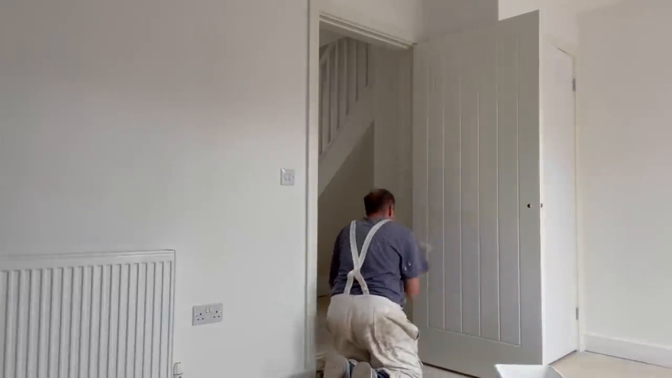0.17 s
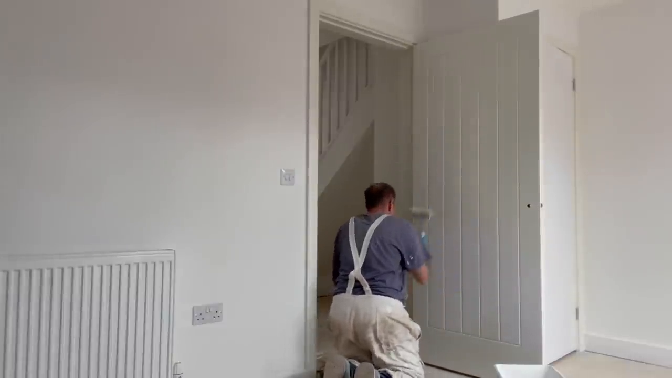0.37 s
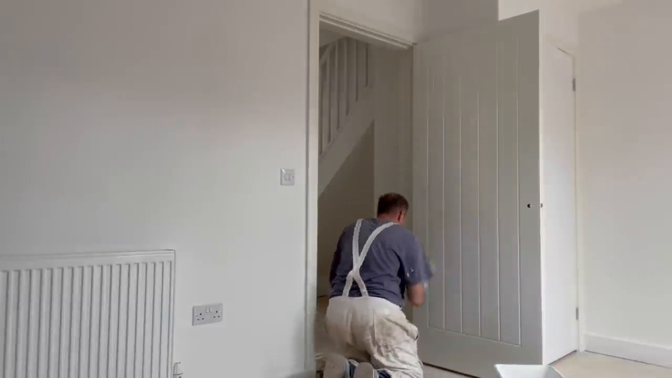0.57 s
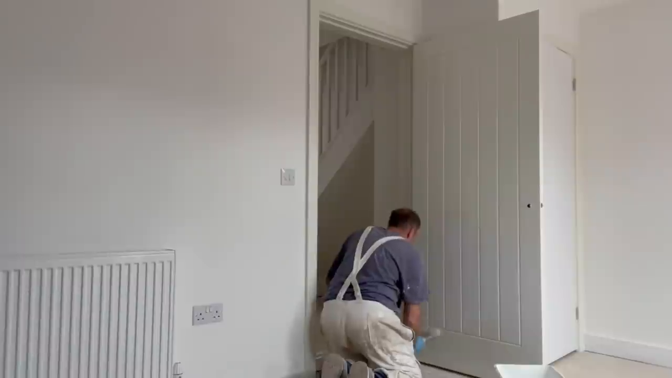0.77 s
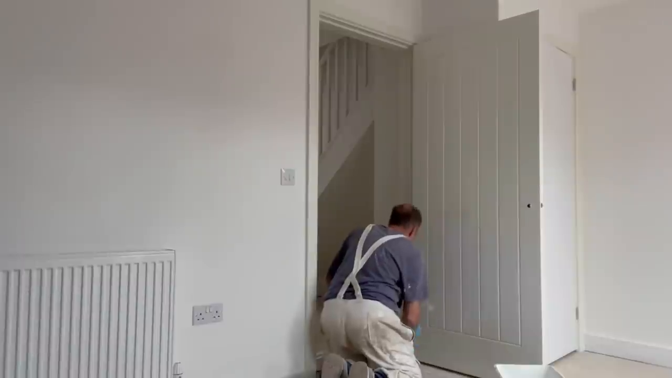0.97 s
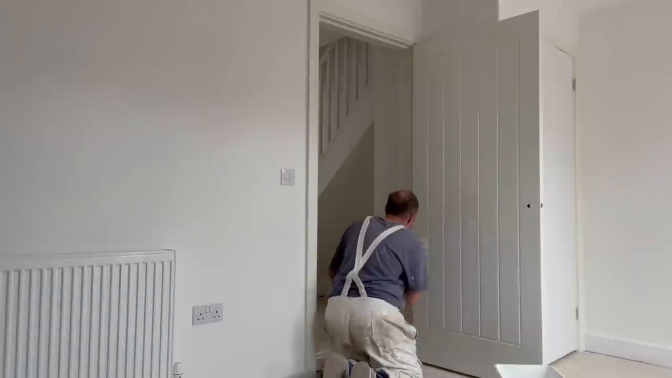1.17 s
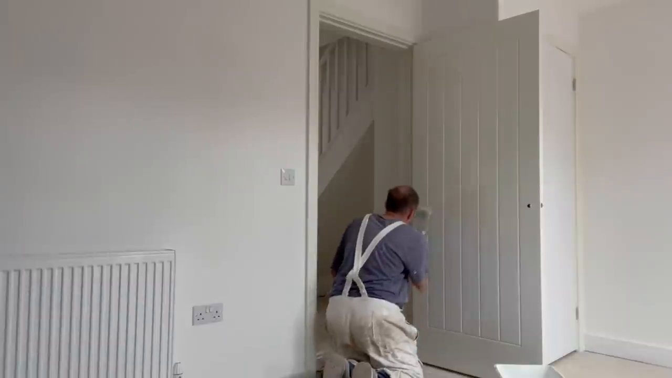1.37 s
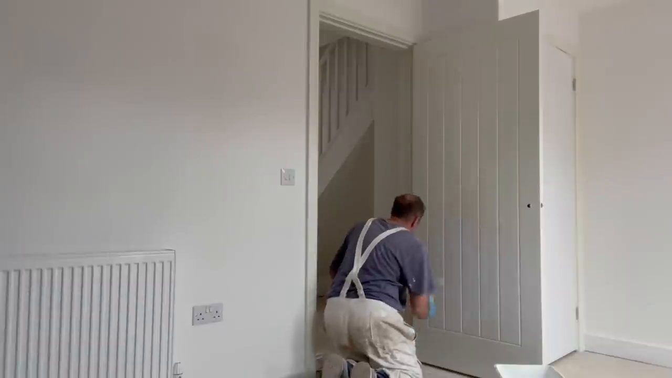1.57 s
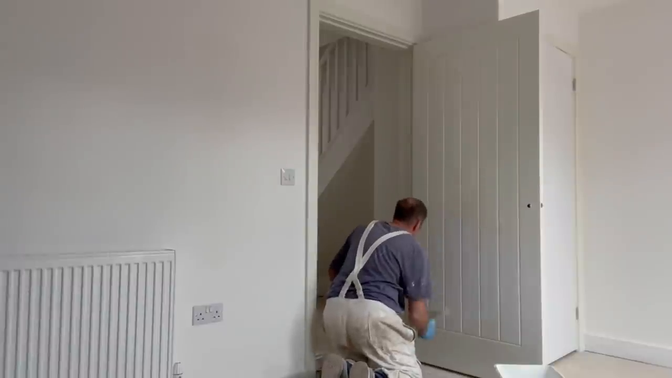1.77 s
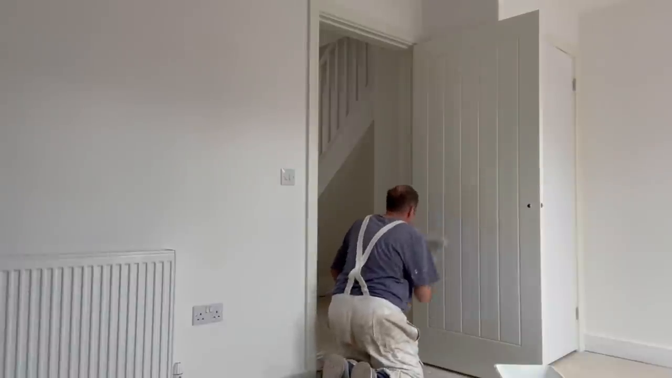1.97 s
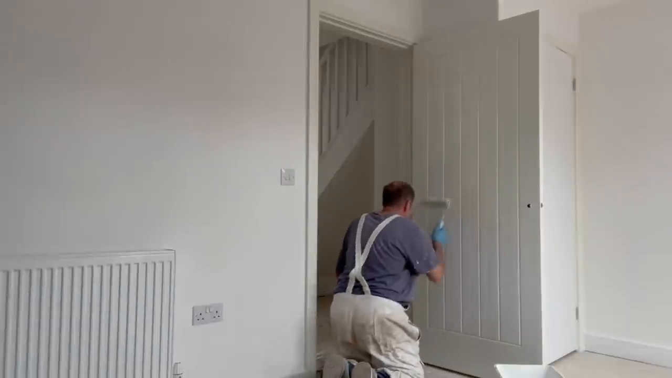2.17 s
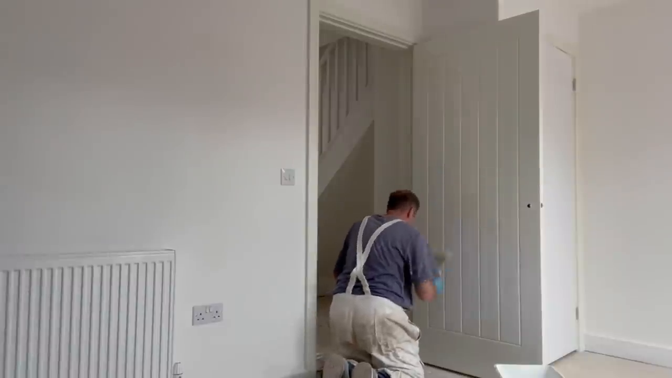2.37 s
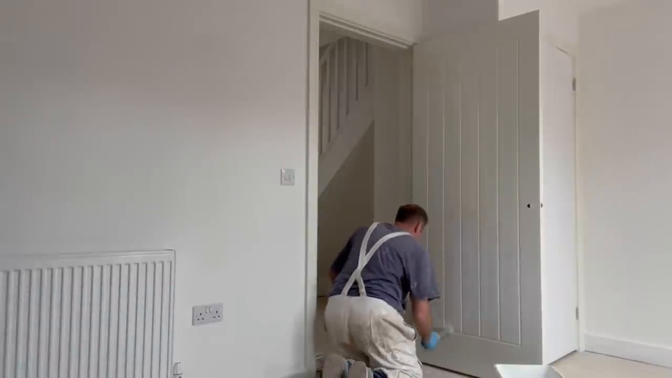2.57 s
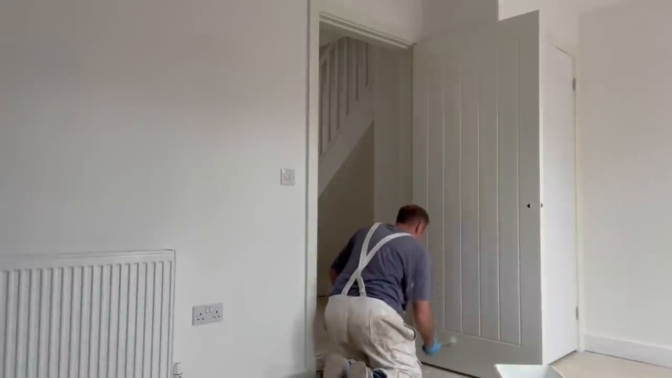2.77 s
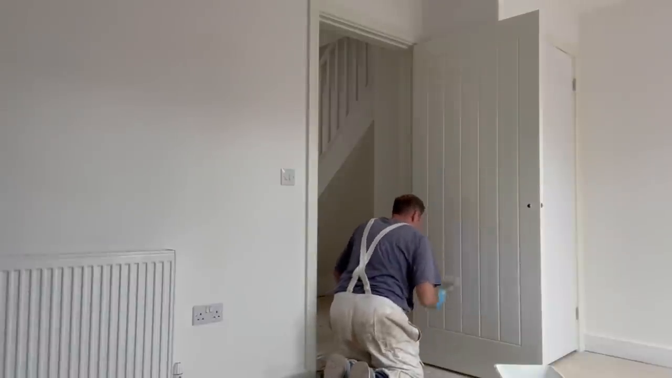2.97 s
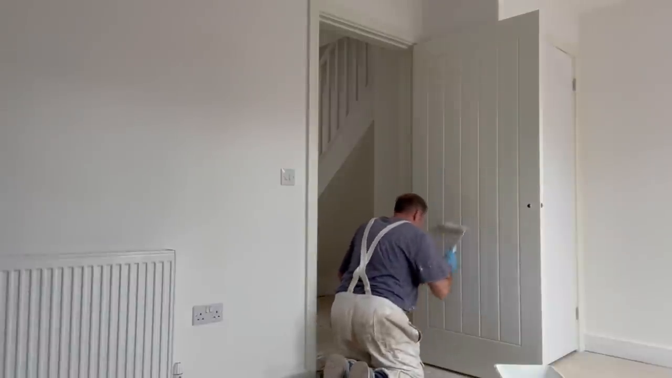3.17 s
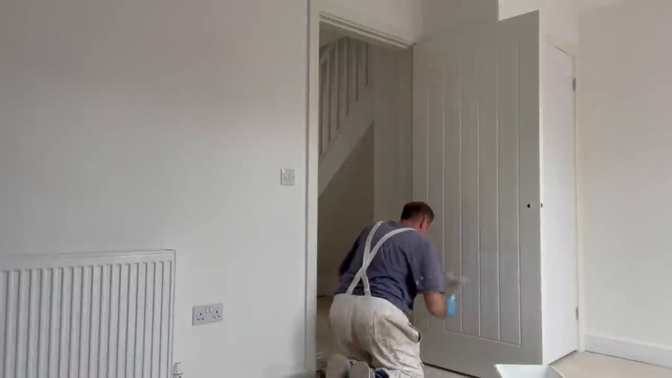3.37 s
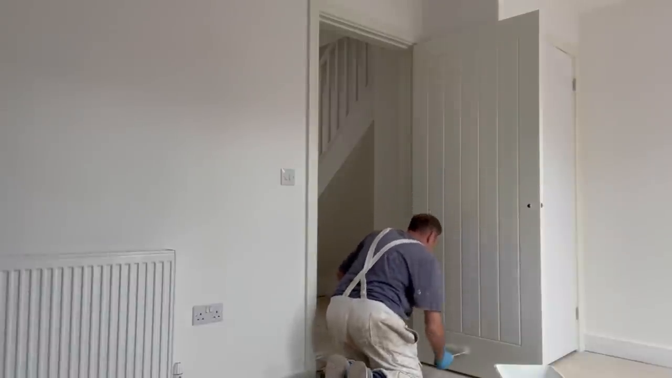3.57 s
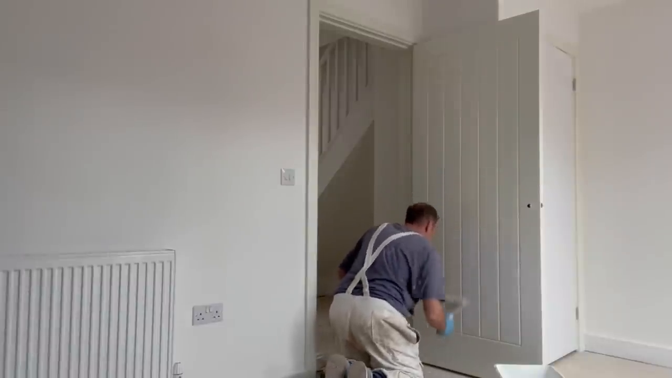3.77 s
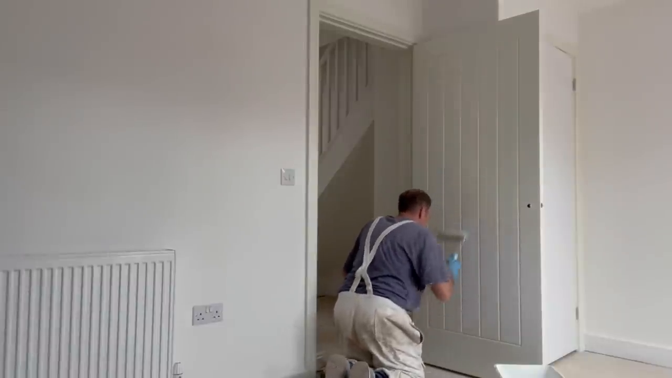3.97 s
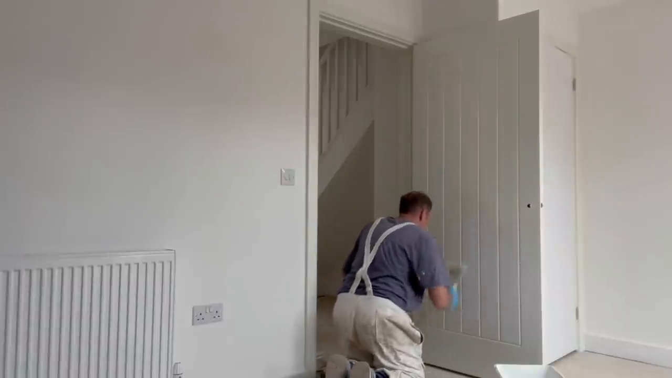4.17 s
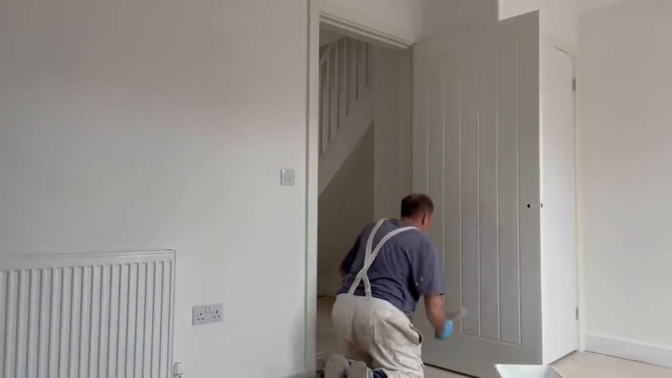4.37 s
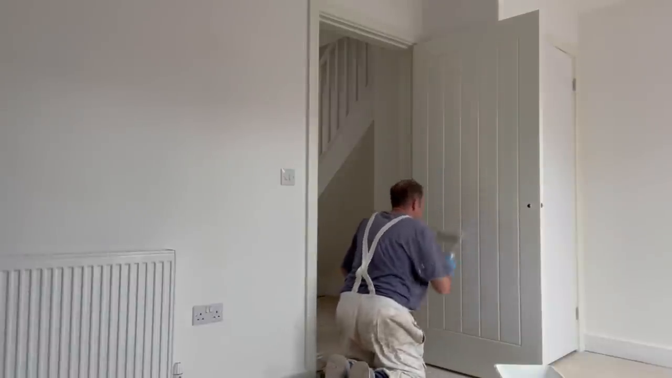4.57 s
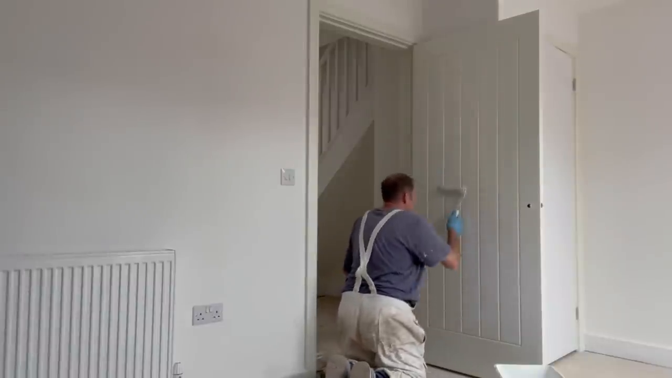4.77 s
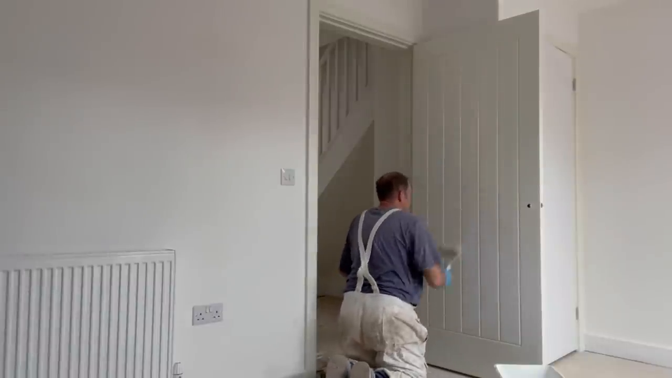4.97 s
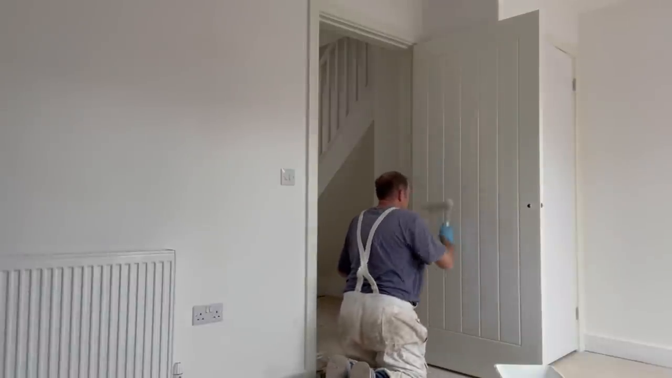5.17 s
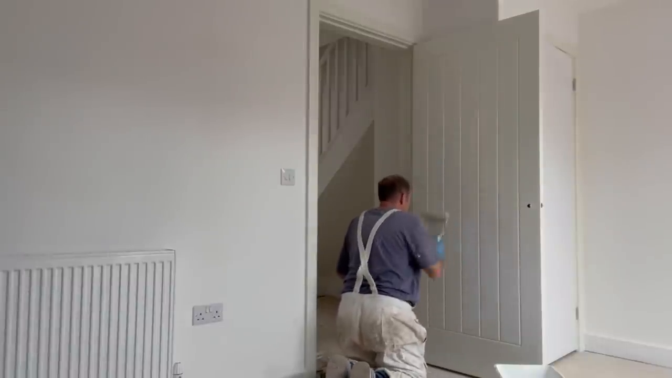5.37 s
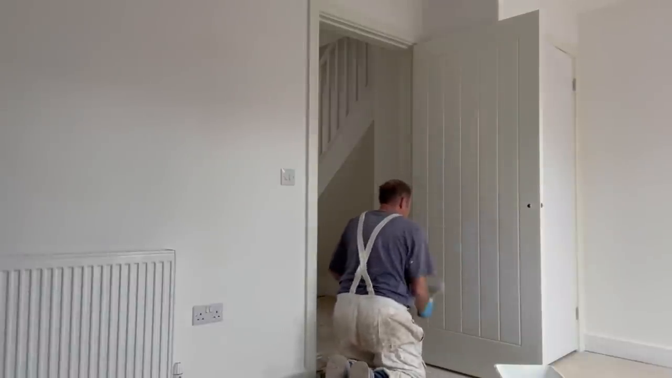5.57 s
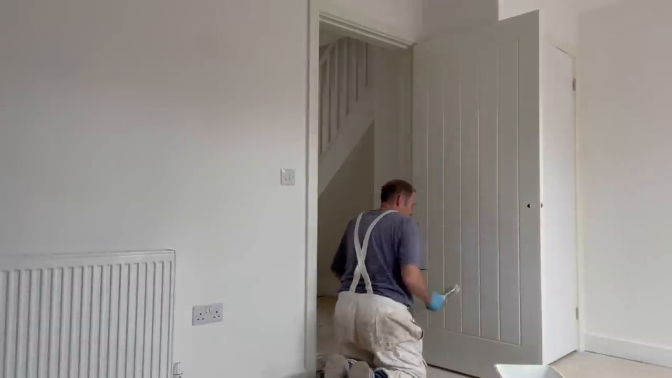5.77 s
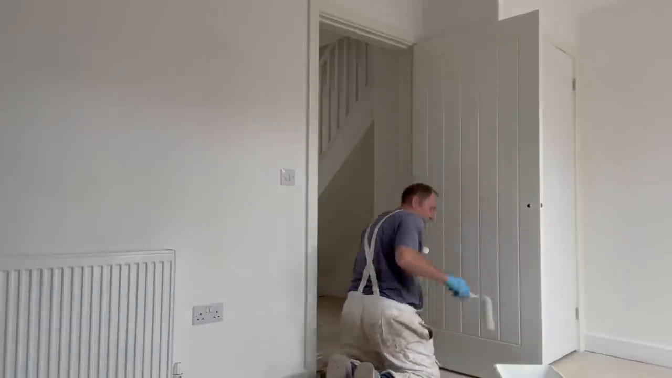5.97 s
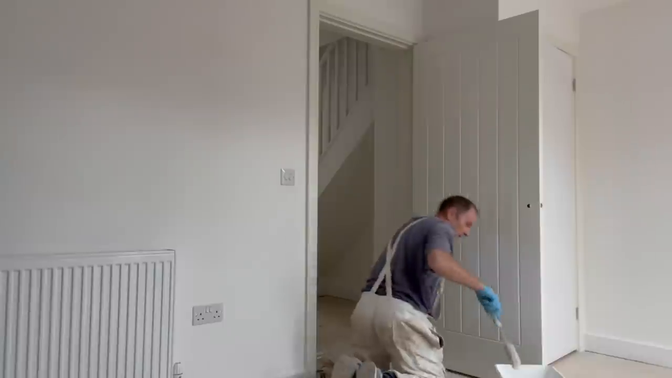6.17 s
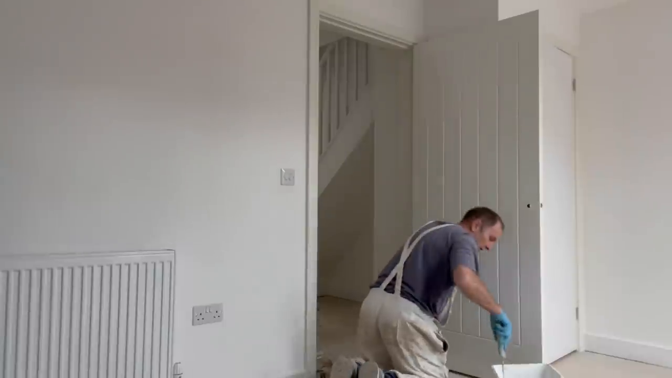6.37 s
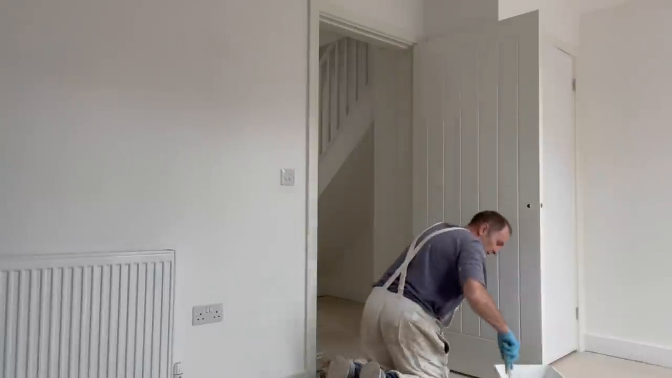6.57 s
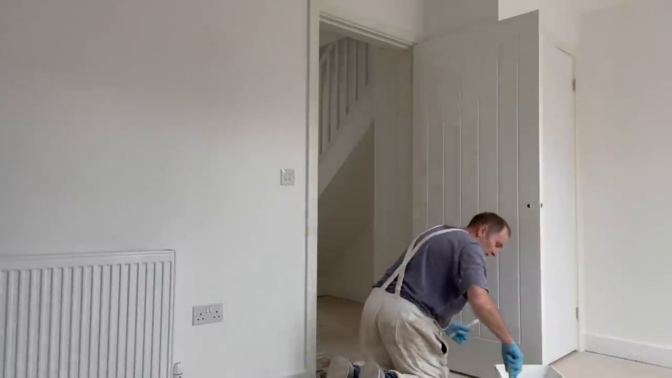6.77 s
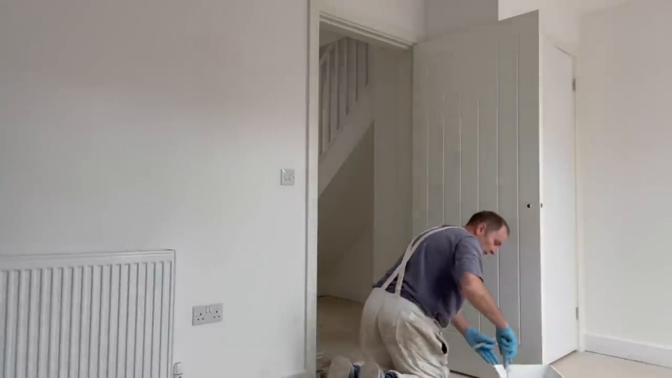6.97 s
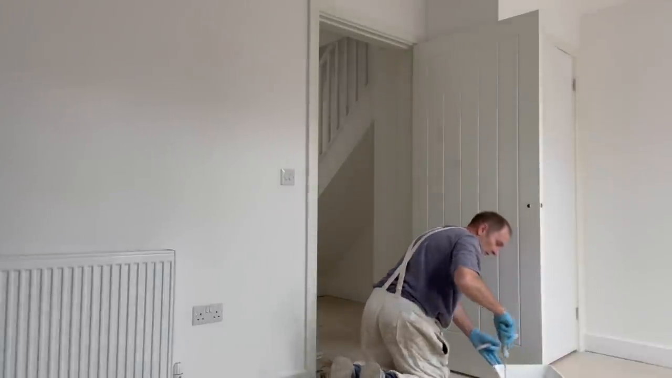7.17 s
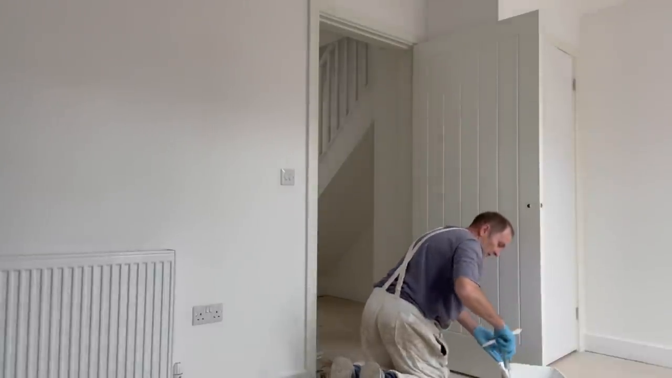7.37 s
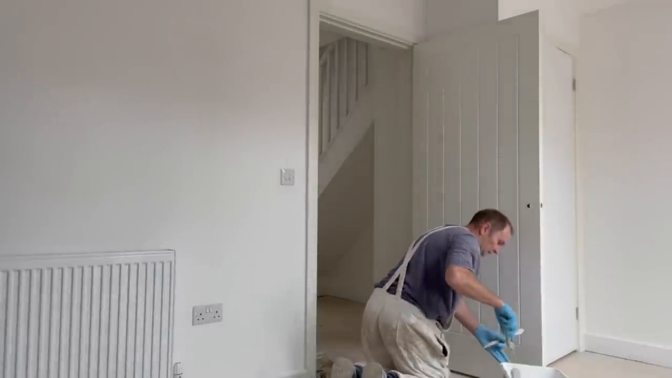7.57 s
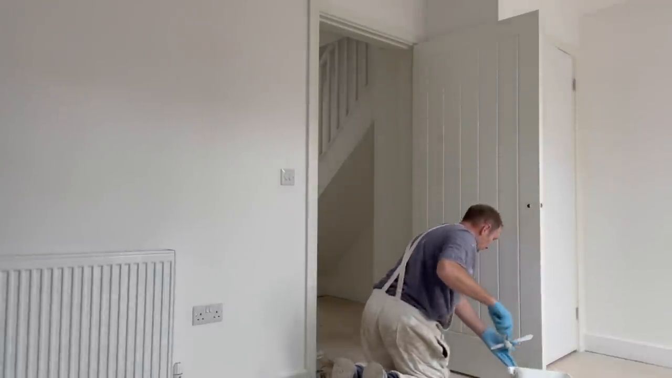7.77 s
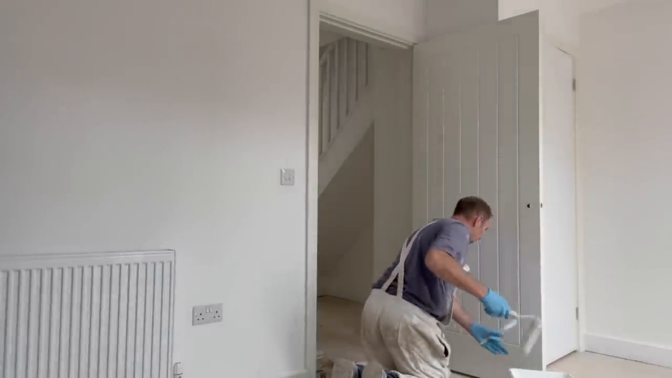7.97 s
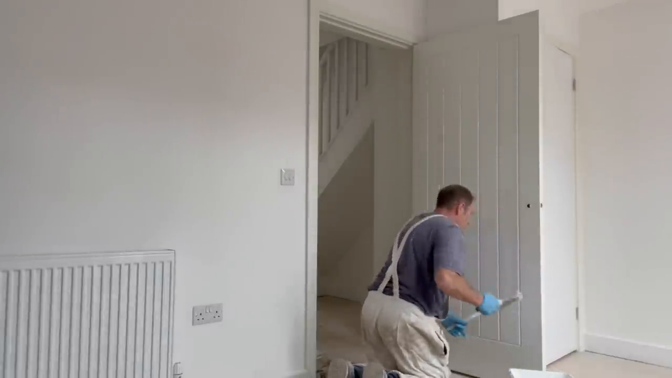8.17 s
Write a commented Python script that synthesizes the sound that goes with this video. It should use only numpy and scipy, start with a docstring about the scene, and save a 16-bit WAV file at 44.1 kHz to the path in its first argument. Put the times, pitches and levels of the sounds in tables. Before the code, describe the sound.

Sticky rolling strokes on a wooden door with low panel drumming and judders, followed by floor thuds, wet dabbing and a sliding tray.

```python
"""A wet hiss over low drumming is heard first: a kneeling painter rolls a wooden door up and down in a bare room.
Impulses from the roller's nap excite the door's modes; finer impulses, shaped in spectrum, are peeling paint.
Shaped noise with gliding resonances makes soft swishes, and judders make the panel ring.
Then he shuffles round, dabs the roller in a plastic tray, sets the tray down and slides it over the floor:
contacts thud in the boards and tick in the plastic, and sliding friction rumbles and scrapes."""
import sys
import numpy as np
from scipy import signal
from scipy.fft import rfft, irfft, next_fast_len
from scipy.io import wavfile
from scipy.ndimage import map_coordinates

SR = 44100
rng = np.random.default_rng(int(sys.argv[2]) if len(sys.argv) > 2 else 0)


def master(y):
    """Save y as 16-bit WAV."""
    cut = np.clip(np.atleast_2d(y).T, -1, 1)
    pcm = np.round(cut * 32767)  # scale
    wavfile.write(sys.argv[1], SR, pcm.astype(np.int16))


N = 362943  # length [samples]


def amp(db):
    """Level definition: decibels to amplitude gain."""
    return 10 ** (np.asarray(db) / 20)


def unit(x):
    """Normalisation by effective value: x at rms 1."""
    return x / np.sqrt(np.mean(x ** 2) + 1e-20)


def along(points, hz):
    """Logarithmic frequency scale: (frequency [Hz], value) points interpolated at hz."""
    f, v = np.transpose(points)
    return np.interp(np.log(hz + 1), np.log(f + 1), v)


def curves(rows):
    """Level envelopes: one dB curve for each column, falling 400 dB/s outside the rows."""
    s, *columns = np.transpose(rows)
    t = np.arange(N) / SR
    outside_s = np.abs(t - np.clip(t, s[0], s[-1]))
    return [np.interp(t, s, column) - 400 * outside_s for column in columns]


def wobble(rate):
    """Slow random modulation: a smooth curve through rate random knots a second."""
    knots = rng.standard_normal(int(N * rate / SR) + 4)
    return map_coordinates(knots, [np.arange(N) * rate / SR])


def filtered(x, response):
    """Linear filtering: the spectrum of x times a complex response of frequency."""
    n = x.shape[-1]
    padded_n = next_fast_len(n + SR // 2)
    hz = np.fft.rfftfreq(padded_n, 1 / SR)
    return irfft(rfft(x, padded_n) * response(hz), padded_n)[..., :n]


def coloured(x, spectrum):
    """Spectral shaping: x weighted by a level curve, at rms 1."""
    return unit(filtered(x, lambda hz: amp(along(spectrum, hz))))


def band(x, lo_hz, hi_hz):
    """Band-pass filtering: the part of x between two soft edges, at rms 1."""
    def response(hz):
        return 1 / (1 + (lo_hz / (hz + 1)) ** 8) / (1 + (hz / hi_hz) ** 8)
    return unit(filtered(x, response))


def ring(x, modes, soft_hz):
    """Modal superposition: resonances of alternating sign, driven through a soft, low-pass contact."""
    def response(f):
        body = 0
        for k, (centre, width, db) in enumerate(modes):
            damping = 1j * f * width
            body = body + (-1) ** k * amp(db) * damping / (centre * centre - f * f + damping)
        return body / (1 + 1j * f / soft_hz) ** 2
    return filtered(x, response)


def grains(rate, spread_db):
    """Shot noise: about rate random impulses of uneven size a second, at rms 1."""
    hits = rng.random(N) < rate / SR
    sizes = rng.standard_normal(N) * amp(spread_db * rng.standard_normal(N))
    return unit(hits * sizes)


def add(track, s, sound, db):
    """Superposition of events: a sound added at time s with the given peak level."""
    part = track[round(s * SR):][:len(sound)]
    part += amp(db) * sound[:len(part)] / np.abs(sound).max()


def push(width):
    """Contact force: one smooth pulse, peaking after width seconds."""
    u = np.arange(SR // 2) / SR / width
    return u * np.exp(-u)


# strokes, up and down in turn: (start [s], door sway [dB], panel drumming [dB], nap rubbing [dB],
# paint hiss [dB], moment of the push [s], push [dB], speeding up [s], braking [s])
STROKES = [(-0.04, -34, -45.5, -44, -41.5, 0.21, 7, 0.11, 0.13),
           (0.343, -37.5, -40.5, -40, -39, 0.6, 7.5, 0.18, 0.16),
           (0.877, -38, -40, -44.5, -40.5, 1.07, 5, 0.072, 0.21),
           (1.352, -44, -36, -40, -36.5, 1.6, 14.5, 0.15, 0.15),
           (1.695, -32.5, -33, -42.5, -40.5, 1.95, 7, 0.041, 0.17),
           (2.152, -46, -29.5, -38.5, -38, 2.53, 5.5, 0.181, 0.204),
           (2.704, -38.5, -33.5, -43, -44.5, 3.02, 3.5, 0.061, 0.095),
           (3.19, -37, -32.5, -38.5, -39, 3.37, 12.5, 0.21, 0.14),
           (3.607, -34, -25, -40, -40, 3.86, 1, 0.1, 0.12),
           (4.015, -40.5, -30.5, -35, -37.5, 4.214, 8, 0.17, 0.17),
           (4.333, -38, -31, -39.5, -38.5, 4.5, 6, 0.053, 0.238),
           (4.76, -38, -32, -39.5, -37.5, 4.89, 5, 0.13, 0.079),
           (5.002, -39.5, -34.5, -39.5, -40.5, 5.12, 6.5, 0.012, 0.19),
           (5.26, -43.5, -36, -40, -39, 5.48, 5.5, 0.13, 0.17)]
LIFT_OFF_S = 5.635  # the last stroke ends
CREEP = 0.3  # least share of full speed left in a turn
PRESS_S = 0.19  # time from the push's peak to 1/e of its dB value
SWAY_LEAN, RUB_LEAN = 0.31, 0.4  # shares of the push that the sway and the rubbing follow
DRUM_GROWS, SWAY_GROWS, RUB_GROWS = 2, 0.94, 1.31  # dB for each dB of speed


def arm():
    """Stroke kinematics: speed and a push in each stroke set the levels of sway, drumming, rubbing and hiss."""
    start, sway_db, drum_db, rub_db, hiss_db, push_s, push_db, rise_s, brake_s = np.transpose(STROKES)
    end, t = np.append(start[1:], LIFT_OFF_S), np.arange(N) / SR
    k = np.maximum(np.searchsorted(start, t, side="right") - 1, 0)  # the stroke at each moment
    since, left = t - start[k], np.maximum(end[k] - t, 0)
    gather = lambda u: np.sin(np.pi / 2 * np.minimum(u, 1)) ** 2
    speed = CREEP + (1 - CREEP) * gather(since / rise_s[k]) * gather(left / brake_s[k])
    speed_db = 20 * np.log10(speed) - 400 * np.maximum(t - LIFT_OFF_S, 0)
    press_db = push_db[k] * np.exp(-((t - push_s[k]) / PRESS_S) ** 2)
    return (sway_db[k] + SWAY_GROWS * speed_db + SWAY_LEAN * press_db,
            drum_db[k] + DRUM_GROWS * speed_db + press_db,
            rub_db[k] + RUB_GROWS * speed_db + RUB_LEAN * press_db,
            hiss_db[k] + speed_db)


# resonances of the door panel: (frequency [Hz], width [Hz], level [dB])
DOOR = [(47.8, 4.2, -13), (93.9, 9.7, -7), (125.6, 11.3, -9), (186.7, 20.6, 0), (222.6, 32.6, 4.5),
        (242.3, 33.8, 6), (283.6, 29, 3.5), (354, 42, -5), (437.3, 35.3, -4.5), (558, 94, -11.5),
        (966, 680, -23)]
# spectrum of peeling paint: (frequency [Hz], level [dB per Hz])
PAINT = [(400, -18), (900, -2.5), (2500, 0.5), (3800, -2), (8000, -0.5), (12000, -4), (15500, -4.5)]
TURNS_PER_S = 20  # sleeve rotation near the loudest hiss, before its random wobble


def roller():
    """Forced vibration: the lumpy sleeve drums the panel once a turn; threads of paint snap behind it."""
    sway_db, drum_db, rub_db, hiss_db = arm()
    pace_db = hiss_db - np.percentile(hiss_db, 95)
    # faster rolling hisses louder
    turn_rate = TURNS_PER_S * np.sqrt(amp(pace_db)) * amp(1.87 * wobble(7))
    turns = np.cumsum(turn_rate) / SR
    lump = amp(1.53 * np.cos(2 * np.pi * turns) + 0.66 * wobble(21.776))
    nap = grains(rate=6000, spread_db=1)
    panel = ring(nap * lump, DOOR, soft_hz=1070)
    # the panel's deepest notes, up to about 160 Hz, sway the whole leaf
    sway = amp(sway_db) * band(panel, 30, 159.5)
    drumming = amp(drum_db) * band(panel, 157, 422)
    # the higher notes come from the nap, with a gentler lump
    rub = amp(rub_db) * band(ring(nap * np.sqrt(lump), DOOR, soft_hz=1190), 479, 1700)
    hiss = coloured(grains(rate=22000, spread_db=0.0), PAINT)
    # slow peeling makes duller snaps
    fizz = filtered(hiss, lambda hz: 1 / (1 + (10500 / (hz + 1)) ** 8))
    dulling = 1 - np.sqrt(amp(np.minimum(pace_db + 4, 0)))
    return sway + drumming + rub + amp(hiss_db) * (hiss - dulling * fizz)


# soft swishes with gliding resonances, most as the painter turns on his knees:
# (peak time [s], rise [s], fade [s], level [dB], centre at the peak [Hz], glide [octaves per s])
SWISHES = [(0.03, 0.26, 0.09, -39, 1560, 1.4), (1.63, 0.079, 0.11, -42.5, 1640, -1),
           (5.815, 0.11, 0.11, -35, 1190, 0.5), (5.955, 0.025, 0.13, -39, 920, -2.5),
           (6.17, 0.055, 0.06, -47.5, 2270, 0), (6.189, 0.07, 0.044, -40, 1420, 1.3),
           (6.577, 0.05, 0.035, -36, 500, 1.3)]
# spectrum of a swish: (multiple of the centre frequency [ratio], level [dB per Hz])
SWISH_SPECTRUM = [(0.22, -18), (0.44, -5), (0.7, -7.5), (0.97, -1), (1.25, -8.5), (1.65, -10), (2, -16.5),
                  (4, -24.5), (10, -34.5)]


def swishes():
    """Spectral scaling: shaped noise read faster or slower, so that its resonances glide as it swells and fades."""
    track, t = np.zeros(N), np.arange(N) / SR
    for s, rise_s, fade_s, db, hz, glide in SWISHES:
        swell = np.exp(-np.maximum((s - t) / rise_s, (t - s) / fade_s) ** 2)
        spectrum = [(k * hz, level) for k, level in SWISH_SPECTRUM]
        noise = coloured(grains(rate=9000, spread_db=0.0), spectrum)
        pace = 2 ** (glide * np.clip(t - s, -2 * rise_s, 2 * fade_s))
        track += amp(db) * swell * np.interp(np.cumsum(pace) % N, np.arange(N), noise)
    return track


# spectrum of the room's still air: (frequency [Hz], level [dB per Hz])
STILL = [(25, -14.5), (60, 1), (130, -19.5), (350, -9.5), (2000, -25.5), (15000, -41)]


def still_air():
    """Stationary background noise: two independent shaped noises, one for each path."""
    return amp(-53.5) * coloured(rng.standard_normal((2, N)), STILL)


# the roller judders and rocks the panel: (time [s], peak level [dB], pitch [Hz])
BUMPS = [(0.598, -18, 255), (1.481, -10.5, 236), (1.53, -11.5, 256), (1.58, -11, 279), (1.643, -14, 282),
         (2.517, -12, 255), (2.546, -18, 100), (2.748, -6.5, 290), (2.774, -11.5, 410), (2.83, -18, 343),
         (3.328, -13.5, 259), (3.378, -12, 251), (3.451, -5, 282), (3.464, -17.5, 106.4),
         (3.477, -9.5, 387), (3.645, -16.5, 254), (4.42, -24.5, 288), (5.448, -17.5, 258),
         (5.538, -22.5, 273)]
JUDDER_CYCLES = 1  # swings until full force
JUDDER_T60_S = 0.15  # 60 dB fade laid over the panel's ring
JUDDER_GRIT = 0.17  # share of nap noise
SCUFF_DB = -9  # the nap's scuff under the hardest judder's peak; lighter ones scuff less


def bumps():
    """Damped oscillation: the roller catches, scuffs and shakes the panel; its pad damps the ring."""
    track, t = np.zeros(N), np.arange(SR // 2) / SR
    hardest_db = max(db for s, db, hz in BUMPS)
    for s, db, hz in BUMPS:
        shaking = np.sin(2 * np.pi * hz * t) + JUDDER_GRIT * rng.standard_normal(len(t))
        force = push(JUDDER_CYCLES / hz) * shaking
        judder = ring(force, DOOR, soft_hz=1500) * amp(-60 * t / JUDDER_T60_S)
        scuff = band(rng.standard_normal(len(t)), lo_hz=394, hi_hz=593) * push(width=0.0054)
        add(track, s, judder, db)
        add(track, s + 0.01, scuff, db + SCUFF_DB + (db - hardest_db) / 2)
    return track


# knee, roller and tray knock on the floor: (time [s], thud [dB], tick [dB], contact cut-off [Hz])
KNOCKS = [(5.937, -30, -51, 900), (6.231, -25, -26.5, 400), (6.266, -24.5, -39.5, 111),
          (6.297, -27, -48.5, 141), (6.372, -43, -28.5, 720), (6.502, -52, -36, 593),
          (6.98, -43.5, -50.5, 90), (7.285, -23, -28.5, 900), (7.309, -12, -33, 900),
          (7.326, -10.5, -29.5, 1200), (7.34, -22.5, -49, 90)]
# resonances of the tray on the floorboards: (frequency [Hz], width [Hz], level [dB])
BOARDS = [(81, 21, -2), (112, 30, -4.5), (150, 29, 3), (217.5, 37, 3), (288, 56, 4.5), (356.4, 29, 8),
          (594, 100, -3.5)]
# spectrum of plastic ticks and wet crackle: (frequency [Hz], level [dB per Hz])
CRACKLE = [(500, 0), (1500, -3), (7500, -6.5), (10000, -10), (15500, -15.5)]


def knocks():
    """Impact excitation: contacts tick in the plastic and thud in the boards, softer ones with deeper notes."""
    track, t = np.zeros(N), np.arange(SR // 2) / SR
    for s, thud_db, tick_db, soft_hz in KNOCKS:
        rattle = 1 + 0.6 * rng.standard_normal(len(t))
        thud = ring(push(width=0.00026) * rattle, BOARDS, soft_hz)
        burst = rng.standard_normal(len(t)) * amp(-60 * t / 0.18)
        tick = filtered(burst, lambda hz: amp(along(CRACKLE, hz)))
        add(track, s, band(thud, lo_hz=55.6, hi_hz=460), thud_db)
        add(track, s, tick, tick_db)
    return track


# the wet roller is swung, dabbed and laid in the tray: (peak time [s], rise [s], fade [s],
# floor rumble [dB], scraping [dB], wet crackle [dB])
DABS = [(5.992, 0.0098, 0.17, -47, -61, -46), (6.24, 0.039, 0.19, -28, -32, -38),
        (6.385, 0.021, 0.22, -56, -38.5, -44.5), (6.57, 0.14, 0.19, -49, -44.5, -38),
        (7.05, 0.24, 0.17, -54.5, -53.5, -45), (7.334, 0.062, 0.26, -29, -45.5, -40)]
# the tray slides over the floor: (time [s], floor rumble [dB], scraping [dB], gritty treble [dB])
SLIDE = [(7.44, -52, -56, -61), (7.49, -45, -40.5, -56), (7.56, -33.5, -30.5, -48), (7.66, -21.5, -23, -43),
         (7.752, -30.5, -27, -31.5), (7.82, -32, -27.5, -42), (7.88, -51, -41.5, -58),
         (8.034, -44.5, -39, -52), (8.1, -47, -51, -80), (8.22, -65, -63, -78)]


def handling():
    """Energy addition: gains of rumble, scraping and crackle summed over the dabs and the slide."""
    t = np.arange(N) / SR
    gains = amp(curves(SLIDE))
    for s, rise_s, fade_s, *levels_db in DABS:
        swell = amp(-20 * np.maximum((s - t) / rise_s, (t - s) / fade_s))
        gains = np.hypot(gains, np.outer(amp(levels_db), swell))
    return gains


# spectrum of the tray's scraping: (frequency [Hz], level [dB per Hz])
SCRAPE = [(200, -25), (500, 1.5), (780, -6), (1350, 0.5), (2000, -5.5), (2600, -7), (4000, -15),
          (9000, -30)]


def floorwork():
    """Sliding friction: random slips scrape the tray and ring the boards; the wet sleeve crackles in the paint."""
    rumble, scrape, crackle = handling()
    slips = grains(rate=12000, spread_db=4.0)
    drive = grains(rate=6000, spread_db=1)
    boards = band(ring(drive, BOARDS, soft_hz=1500), lo_hz=35, hi_hz=3000)
    # these fine impulses also serve as the gritty treble of the slide
    wet = coloured(grains(rate=8400, spread_db=-0.5), CRACKLE)
    return rumble * boards + scrape * coloured(slips, SCRAPE) + crackle * wet


# reverberation of the bare room: (frequency [Hz], t60 [s])
ROOM = [(80, 0.62), (400, 1), (6000, 0.9), (15000, 0.15)]


def room(x, early_db, late_db, count=48):
    """Reverberation by convolution: two unrelated paths whose random echoes crossfade to new ones."""
    size, hop = round(.7 * SR), N // count + 1
    noise = rng.standard_normal((count + 1, 2, size)).astype(np.float32)
    hz, t, z = signal.stft(noise, SR, nperseg=256)
    decay = amp(-60 * t / along(ROOM, hz)[:, None]).astype(np.float32)
    tails = signal.istft(z * decay, SR, nperseg=256)[1][..., :size]
    wall_fade = amp(-60 * np.arange(size) / SR / 0.035)
    crossfade = np.sin(np.pi * np.arange(2 * hop) / (2 * hop)) ** 2
    out, padded = np.zeros((2, N + 3 * hop + size)), np.pad(x, (hop, 2 * hop))
    for k, tail in enumerate(tails):
        walls = rng.standard_normal(tail.shape) * wall_fade
        early = amp(early_db) * walls / np.linalg.norm(walls[0])
        late = amp(late_db) * tail / np.linalg.norm(tail[0])
        paths = early + late
        # the first path holds the straight sound; the second has a strong glance off a side wall
        paths[0, 0] += 1
        paths[1, round(rng.uniform(.001, .006) * SR)] += 1
        piece = padded[k * hop:][:2 * hop] * crossfade
        heard = signal.fftconvolve(piece[None], paths / np.linalg.norm(paths[0]), axes=1)
        out[:, k * hop:k * hop + heard.shape[1]] += heard
    return out[:, hop:hop + N]


def scene():
    """Superposition in the room: blows get stronger early echoes and a weaker late tail than rubbing."""
    rubbing = room(roller() + swishes() + floorwork(), early_db=-8.5, late_db=-6.0)
    blows = room(bumps() + knocks(), early_db=-4.5, late_db=-8, count=12)
    return rubbing + blows + still_air()


# correlation between the left and right channels: (frequency [Hz], correlation [-1 to 1])
CORRELATION = [(90, 0.95), (340, 0.18), (5800, 0.03), (7300, 0.81), (9200, 0.67), (10400, 1), (11900, 1),
               (12900, 0.68), (14100, 0.83)]
# phase between the channels: (frequency [Hz], lag of left behind right [half turns])
LAG = [(330, 0), (800, .9), (1700, .8), (3000, 0), (8000, 0), (9200, .4), (10300, 1), (11900, 1),
       (13900, 2)]
TOP_HZ = 15800  # upper band limit


def record(dry):
    """Interchannel coherence: two channels blend the paths, turn their phase and limit bass and treble."""
    turn = lambda hz: np.arccos(np.clip(along(CORRELATION, hz), -1, 1)) / 2
    common, apart = filtered(dry, lambda hz: np.array([np.cos(turn(hz)), np.sin(turn(hz))]))
    pair = np.array([common + apart, common - apart])

    def response(hz):
        phase = np.exp(np.outer([-1, 1], .5j * np.pi * along(LAG, hz)))
        bass_cut = (1j * hz / (28 + 1j * hz)) ** 2
        return phase * bass_cut * (hz < TOP_HZ)
    return filtered(pair, response)


dry = scene()
out = record(dry)
master(out)
```